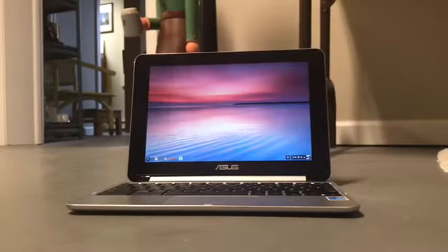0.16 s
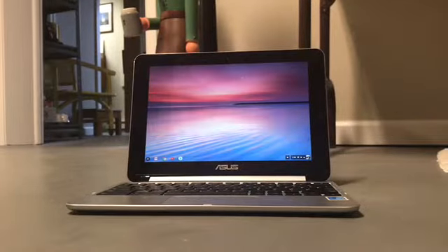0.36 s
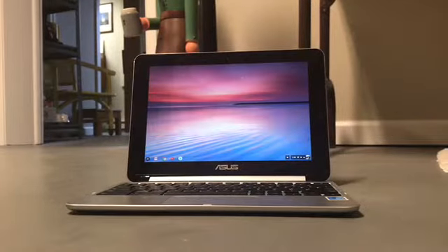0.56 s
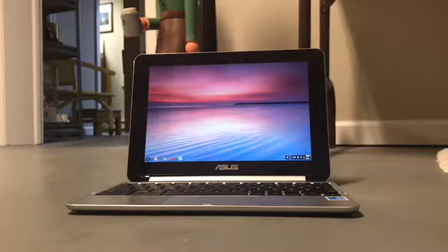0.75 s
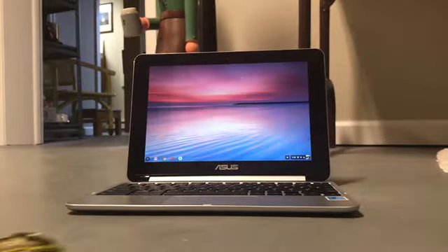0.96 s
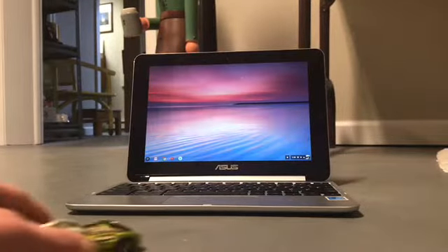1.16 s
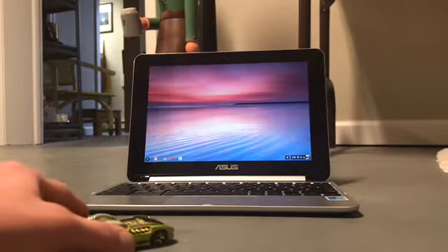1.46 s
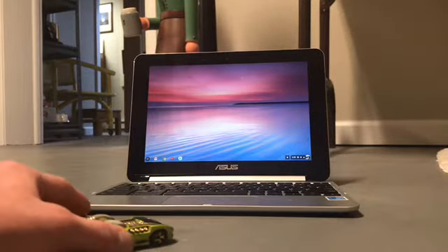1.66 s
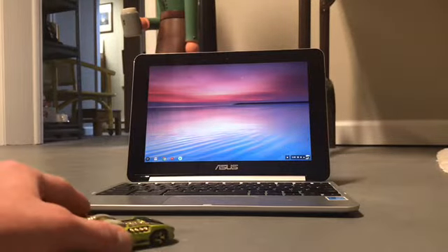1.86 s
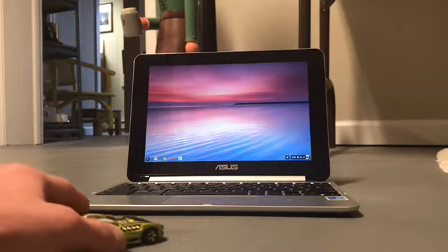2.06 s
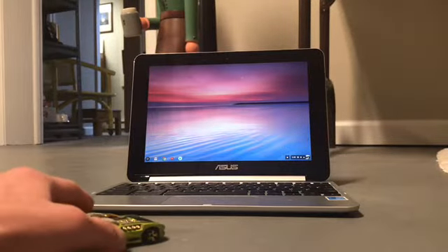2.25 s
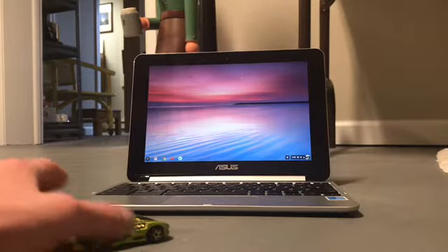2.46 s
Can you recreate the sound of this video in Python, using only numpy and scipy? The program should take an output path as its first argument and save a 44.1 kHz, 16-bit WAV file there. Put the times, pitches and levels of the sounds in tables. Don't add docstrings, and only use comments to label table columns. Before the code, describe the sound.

Die-cast toy car set down and rolled closer with gritty metallic rattling, then a short clack

```python
import sys
import numpy as np
from scipy import signal
from scipy.fft import rfft, irfft
from scipy.io import wavfile
from scipy.ndimage import map_coordinates

SR = 44100
rng = np.random.default_rng(int(sys.argv[2]) if len(sys.argv) > 2 else 0)


def store_pcm(level_fs):
    pcm = np.round(np.clip(level_fs, -1, 1) * 32767).astype(np.int16)
    wavfile.write(sys.argv[1], SR, np.atleast_2d(pcm).T)


def volts(x):
    e = np.asarray(x, float) / 20
    return 10 ** e


N = 114660


def rolling_car():
    # (time [s], level [dB], chassis [dB], axle pins [dB], side facing the microphone [0-1])
    long_roll = [
        (.262, -54, 2, 3, 0.8),
        (.31, -57.5, 8, -3, 0.22),
        (.43, -44, 3.5, -4, 0.26),
        (.6, -38.5, -1.5, 1.5, 0.52),
        (.74, -38.5, 2, -4, 0.75),
        (.95, -39.5, -3, -7.5, 0.78),
        (1.07, -37.5, -3, -3, 0.87),
        (1.226, -38, -4.5, -1, 0.92),
        (1.238, -53.5, 7, -8.5, 0.86),
        (1.32, -71, 2.5, -4, 0.3),
    ]
    # (time [s], peak [dB], chassis [dB], axle pins [dB])
    carried = [
        (.048, -51, 12.5, -17),
        (.076, -49, 12, -2),
        (.081, -43.5, 4, -4.5),
        (.182, -56, 12, -9),
        (.205, -50, 12, -9),
        (.236, -54, 15, -4),
    ]
    # (time [s], peak [dB], chassis [dB], axle pins [dB])
    on_the_way = [(0.325, -32, 5.5, -13), (0.335, -33.5, 1.5, -6), (.357, -28, -8, -14),
                  (.388, -29, -12, -8), (0.398, -36, -7, -8), (0.4252, -25.5, -2, -3),
                  (0.428, -29.5, 6, 6.5), (0.4468, -25, 2.5, 7), (.449, -28.5, 7, 5), (0.434, -29, -2.5, 4),
                  (0.492, -34, -5, 3), (0.549, -40, -12, -2), (0.582, -26, -5, 5), (.609, -27, -3, 0),
                  (.684, -28, -8, 5), (.705, -27, -5, 3), (0.711, -32, -6, 0), (0.5705, -26, 8, 2.5),
                  (.597, -33, -2, -17), (.6226, -16, -13, 5), (.632, -22.5, -3.5, 7.5),
                  (0.636, -16, -5, -6), (0.669, -17, -19, -1), (.695, -17, -6, 1.5),
                  (0.802, -27, 11.5, -14), (0.8496, -20.5, -9, -1), (.854, -17, -3.5, -6),
                  (0.802, -32, -4, 2), (.822, -36, -8, 6), (.873, -28, 0, 8), (0.8802, -18, -9, -5),
                  (.898, -30, -8, 3), (0.917, -23, -14, -8), (1.0, -30.5, 8, -2), (1.005, -27, -1, 2),
                  (1.025, -19, -21, -15), (1.0607, -21, -0.5, 3), (1.0737, -19.5, -3, 2.5),
                  (1.078, -23, 9, 2), (1.092, -22, -4, 1), (1.104, -36, -13, -6), (1.159, -28, -5, 6),
                  (1.168, -28, -1, 4), (1.181, -29, -3, 3), (1.198, -21, -7, -2), (1.119, -15.5, -14, -11),
                  (1.143, -20.5, -1, 3.5), (1.211, -30, -5, -5), (1.222, -23, -1, 4.5)]
    # (time [s], peak [dB], chassis [dB], axle pins [dB])
    landing = [
        (0.243, -13, -3.5, 6.5),
        (.2436, -18, -3, -1),
        (.2495, -27, 2, -14),
        (.258, -47, 3, -2),
        (.2655, -24, -1, -2),
        (.267, -26, -8, -10),
    ]
    # (time [s], peak [dB], chassis [dB], axle pins [dB])
    jolt = [(0.7194, -28.5, 3.5, 3.5), (0.7201, -17, -2, 9), (0.7256, -22, -10.5, -3.5),
            (0.7272, -11.5, -14, -4), (0.7285, -15, -16.5, -7), (0.7305, -11.5, 3.5, 6.5),
            (0.7314, -7, 5.5, 1.5), (0.7323, -14, -10.5, -1.5), (.7343, -13, -10.5, 3),
            (.736, -17, -7.5, 1.5), (0.743, -22.5, 3, -6.5), (.7475, -31, -2, -1)]
    # (frequency [Hz], width [Hz], level [dB])
    rolling_chassis = [(1204, 750, -11.5), (1690, 427, -6), (2150, 320, -8.5), (2540, 270, -3),
                       (2946, 220, -3.5), (3320, 125, -1.5), (3960, 720, -12)]
    landing_chassis = [(1120, 600, -6.5), (2000, 900, -6), (2700, 460, 1.5), (3370, 270, -1),
                       (4190, 700, -10.5)]
    jolt_chassis = [(1753, 500, -7), (2280, 500, -3.5), (2830, 385, 2.5), (3460, 290, -1),
                    (3670, 500, -11.5)]

    side = in_time(long_roll)[3]
    car = rolling(long_roll, rolling_chassis) + knocks(carried + on_the_way, side, rolling_chassis)
    car = car + knocks(landing, 0.64, landing_chassis) + knocks(jolt, 0.73, jolt_chassis)
    return car + floor_echo(car, side)


def held_car():
    # (time [s], level [dB], chassis [dB], axle pins [dB], side facing the microphone [0-1])
    nudge = [
        (1.775, -69.5, 6.5, -4, 0.7),
        (1.81, -73, 4, 9, 0.85),
        (1.83, -37.5, -6.5, -11, 0.9),
        (1.85, -33, -16, -19, 0.8),
        (1.875, -75.5, -7, -4, .8),
    ]
    # (time [s], peak [dB], chassis [dB], axle pins [dB])
    clack = [
        (1.78, -45, -4, -7),
        (1.801, -35, -6, -13),
        (1.8148, -36.5, 3, -4),
        (1.8262, -41, -7, -8),
        (1.8312, -32, -10, 6),
        (1.8392, -23, 0, 0.5),
        (1.8435, -40, -9, -12),
        (1.8494, -20, 12, 1.5),
        (1.8502, -27, 11.5, 2),
        (1.8615, -29, -8, 0),
    ]
    # (time [s], peak [dB], chassis [dB], axle pins [dB])
    ticks = [
        (1.33, -57, 14.5, 1),
        (1.508, -56.5, 3.5, 5),
        (1.5255, -39, 4.5, 7),
        (1.5395, -57.5, 13, -6.5),
        (1.6765, -51.5, 16, -12),
        (1.6895, -55.5, 15, -11.5),
        (1.7058, -43, 7.5, 8),
        (2.001, -58, 10, 0),
        (2.072, -52.5, 13.5, -4),
        (2.137, -54.5, -8, 1),
    ]
    # (time [s], peak [dB], chassis [dB], axle pins [dB])
    rocking = [
        (2.256, -55.5, 5.5, -9.5),
        (2.264, -44.5, 1, -7),
        (2.268, -43, 5, -7),
        (2.2785, -36, -4.5, 8),
        (2.2798, -31, 0.5, -2),
        (2.294, -47, -5, -2),
    ]
    # (frequency [Hz], width [Hz], level [dB])
    held_chassis = [(1520, 230, -11), (2510, 540, 5), (3470, 450, -0.5), (4150, 520, 2), (4300, 560, -8)]
    resting_chassis = [(2120, 500, -5.5), (2590, 280, 6.5), (3120, 420, 3), (3480, 430, -1),
                       (4590, 480, -11)]
    rocking_chassis = [(1940, 210, 5), (2210, 330, 5), (2860, 270, 0), (4030, 200, -4), (4960, 280, 0.5)]

    car = rolling(nudge, held_chassis) + knocks(clack, 0.93, held_chassis)
    return car + knocks(ticks, 0.92, resting_chassis) + knocks(rocking, 0.98, rocking_chassis)


def rolling(curve, chassis):
    grit_per_s, grit_spread_db = 5000, 3.5
    slaps_per_s, slap_db, slap_spread_db, slap_fade_s = 260, -7.5, 3.5, 0.0027
    own_slap_db = -0.5

    db, chassis_db, pin_db, side, moving = in_time(curve)
    sizes = volts(grit_spread_db * np.minimum(rng.exponential(1, (3, N)), 4))
    sizes = sizes * rng.choice([-1, 1], (3, N))
    grit = rms_one(sizes * (rng.random((3, N)) < grit_per_s / SR))

    slap_sizes = volts(slap_db + slap_spread_db * rng.standard_normal(N))
    slaps = (rng.random(N) < slaps_per_s / SR) * slap_sizes
    slaps = slaps * volts(own_slap_db * rng.standard_normal((3, N)))

    force = rms_one(grit * (1 + dying(slaps, slap_fade_s))) * volts(db + 13.5) * moving
    return shell(force * volts([0 * db, chassis_db, pin_db]), side, chassis)


def knocks(rows, side, chassis):
    chatter_db, chatter_s = -17, 0.0015
    part_db = [[0], [-8], [0]]

    s, db, chassis_db, pin_db = np.transpose(rows)
    peaks = volts(db + 19 + np.array([0 * db, chassis_db, pin_db]))
    clicks = np.zeros((3, N))
    np.add.at(clicks, (slice(None), (s * SR).astype(int)), peaks)
    chatter = dying(clicks, chatter_s) * rng.choice([-1, 1], (3, N))
    return shell(clicks + volts(chatter_db) * volts(part_db) * chatter, side, chassis)


def shell(forces, side, chassis):
    # (frequency [Hz], width [Hz], level [dB])
    far_side = [(4640, 248, -2.4), (5150, 280, 1), (5656, 414, -0.16)]
    near_side = [(5543, 78, -3), (5916, 214, 3.5), (6110, 683, -4.5)]
    roof = [(1700, 400, -10), (6900, 410, -0.5), (7670, 1100, -7)]
    far_pins = [(8890, 1100, -4), (9294, 560, -5.5), (12160, 4000, -13.5), (13400, 900, -12),
                (14600, 900, -15.5)]
    near_pins = [(8220, 360, -19.5), (9553, 300, -6), (11300, 1200, -16), (13900, 1100, -15),
                 (15300, 1800, -22.5)]

    panel_force, chassis_force, pin_force = forces
    far = np.sqrt(1 - np.clip(side, 0, 1))
    near = np.sqrt(np.clip(side, 0, 1))
    panels = resonate(panel_force * far, far_side) + resonate(panel_force * near, near_side)
    panels = panels + resonate(panel_force * near ** 8, roof)
    pins = resonate(pin_force * far, far_pins) + resonate(pin_force * near, near_pins)
    low_modes = resonate(chassis_force * (0.24 + far), chassis[:2])
    high_modes = resonate(chassis_force * near, chassis[2:])
    return panels + pins + low_modes + high_modes


def fingers():
    # (time [s], level [dB])
    slide = [
        (1.88, -80),
        (1.95, -80),
        (2.08, -65.5),
        (2.14, -67),
        (2.16, -93.5),
        (2.37, -72.5),
        (2.41, -59),
        (2.52, -53),
        (2.6, -47),
    ]
    # (time [s], peak [dB])
    skin_snaps = [(1.9408, -51), (1.954, -54), (1.972, -49), (1.9865, -52), (2.0027, -49), (2.0201, -42),
                  (2.0441, -53), (2.0545, -49), (2.061, -48), (2.1369, -49), (2.165, -57)]
    # (frequency [Hz], level per Hz [dB])
    skin = [(1470, -21.5), (2500, -1.5), (2920, -2), (5520, 1.5), (11800, -2), (13900, 2), (16000, -3)]

    db, moving = in_time(slide)
    s, snap_db = np.transpose(skin_snaps)
    clicks = np.zeros(N)
    clicks[(s * SR).astype(int)] = volts(snap_db + 3.5)
    bursts = dying(clicks, 0.00053) * rng.standard_normal(N)
    snaps = resonate(bursts, [(10000, 3200, -17), (13700, 2100, 1.0)])
    return volts(db) * moving * coloured(skin) + snaps


def floor_echo(x, side):
    far_lag_s, near_lag_s = 0.00034, 0.000275
    lag = far_lag_s + (near_lag_s - far_lag_s) * side
    return volts(-22) * map_coordinates(x, [np.arange(N) - lag * SR], order=3)


def room(x):
    near_t60_s, near_db = 0.15, -14.5
    room_t60_s, room_db = 0.35, -19

    t = np.arange(SR // 2) / SR
    near, late, bright = rng.standard_normal((3, len(t)))
    dull = signal.lfilter(*signal.butter(1, 9000, fs=SR), late)
    tail = dull * volts(-60 * t / room_t60_s) + 0.86 * bright * volts(-100 * t / room_t60_s)
    tail = tail * np.clip(t / 0.0013, 0, 1)
    near = near * volts(-60 * t / near_t60_s) * np.clip(t / 0.004, 0, 1)
    echo = volts(near_db) * near / np.linalg.norm(near) + volts(room_db) * tail / np.linalg.norm(tail)
    return signal.fftconvolve(x, echo)[:N]


def room_tone():
    # (frequency [Hz], level per Hz [dB])
    hum = [(22, -43), (36, -29.5), (50, -9), (100, -9), (199, -0.5), (426, -18.5), (1010, -19),
           (4000, -46.5), (16000, -62.5)]
    # (frequency [Hz], width [Hz], level [dB])
    machines = [(60.3, 4.1, -58), (97, 14, -58), (192, 41.5, -51), (232, 36, -63), (365, 48, -64),
                (638, 110, -62.5)]

    drones = 0
    for hz, width, db in machines:
        drone = resonate(rng.standard_normal(N), [(hz, width, 0)])
        drones = drones + volts(db) * rms_one(drone)
    return volts(-52) * coloured(hum) + drones


def rms_one(x):
    return x / np.sqrt(np.mean(x ** 2) + 1e-20)


def in_time(rows):
    s, *columns = np.transpose(rows)
    t = np.arange(N) / SR
    inside = (t >= s[0]) & (t <= s[-1] + .001)
    return [np.interp(t, s, c) for c in columns] + [inside]


def resonate(x, peaks):
    out = 0
    for k, (hz, width, db) in enumerate(peaks):
        r = np.exp(-np.pi * width / SR)
        b = [(1 - r * r) / 2, 0, (r * r - 1) / 2]
        a = [1, -2 * r * np.cos(2 * np.pi * hz / SR), r * r]
        out = out + (-1) ** k * volts(db) * signal.lfilter(b, a, x + 1e-18)
    return out


def dying(clicks, seconds):
    return signal.lfilter([1], [1, -np.exp(-1 / (seconds * SR))], clicks + 1e-18)


def coloured(spectrum):
    hz, db = np.transpose(spectrum)
    grid = np.fft.rfftfreq(N, 1 / SR) + 1
    gain = volts(np.interp(np.log(grid), np.log(hz), db, left=-60))
    return rms_one(irfft(rfft(rng.standard_normal(N)) * gain, N))


def scene():
    car = rolling_car() + held_car() + fingers()
    car = signal.sosfilt(signal.butter(2, 1100, "high", fs=SR, output="sos"), car)
    return (car + room(car) + room_tone())[None]


def roll_off(x):
    return signal.sosfilt(signal.butter(12, 16860, fs=SR, output="sos"), x)


def record(dry):
    low_pass = signal.ellip(10, .1, 50, 15750, fs=SR, output="sos")
    cut = signal.sosfilt(low_pass, dry)
    return roll_off(cut)


dry = scene()
out = record(dry)
store_pcm(out)
```